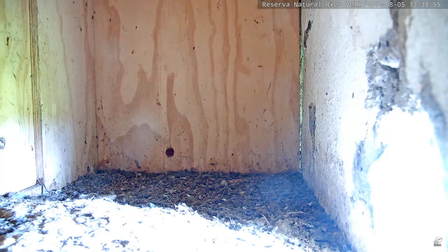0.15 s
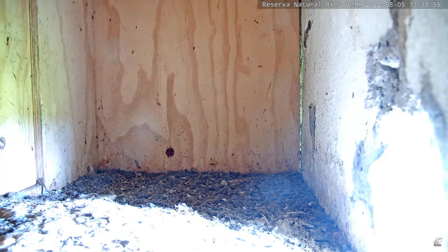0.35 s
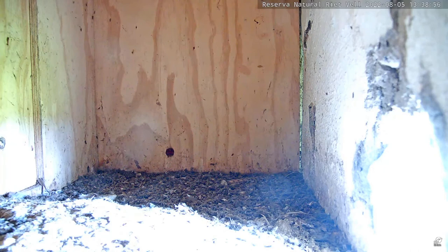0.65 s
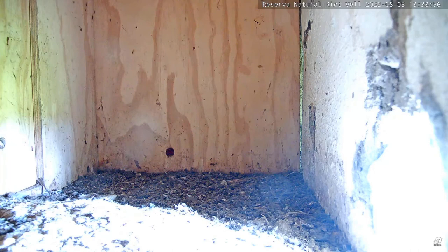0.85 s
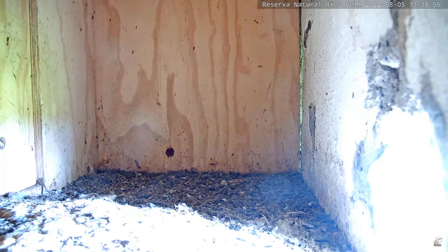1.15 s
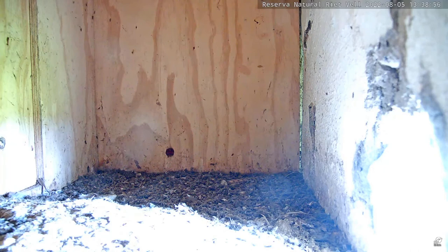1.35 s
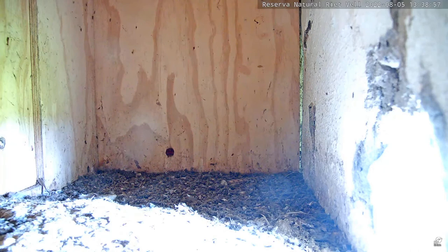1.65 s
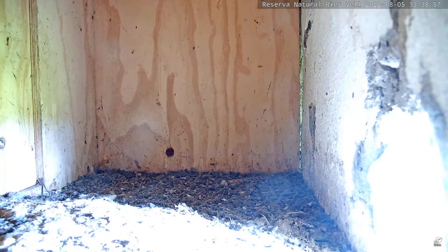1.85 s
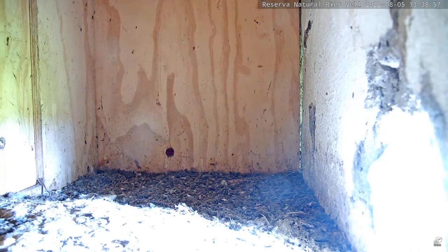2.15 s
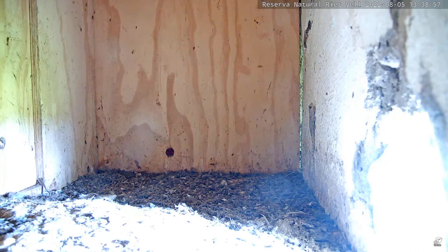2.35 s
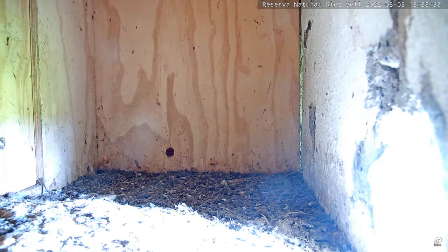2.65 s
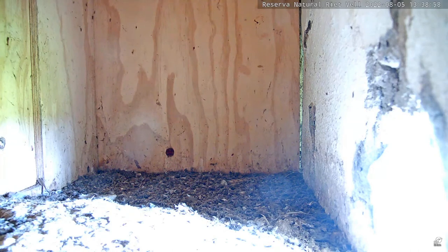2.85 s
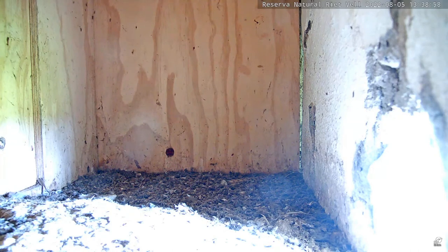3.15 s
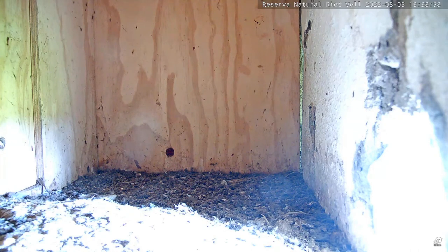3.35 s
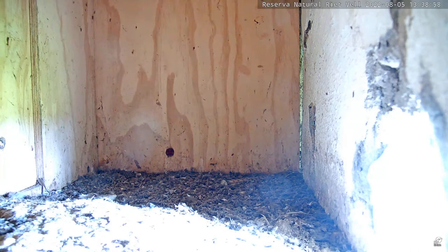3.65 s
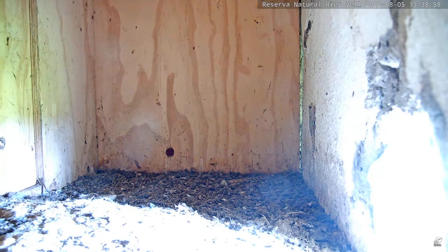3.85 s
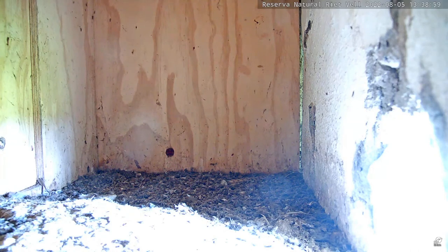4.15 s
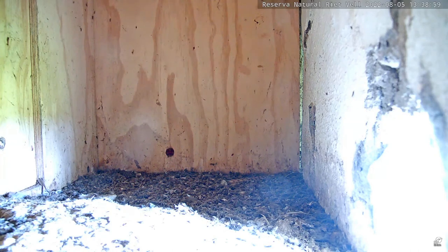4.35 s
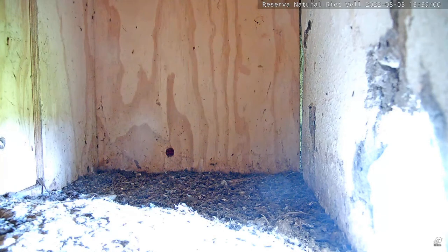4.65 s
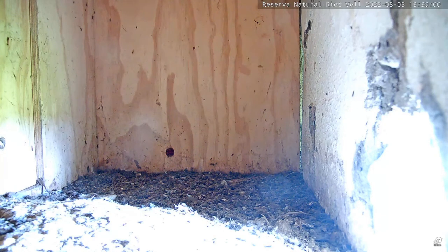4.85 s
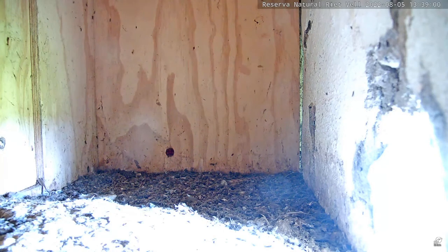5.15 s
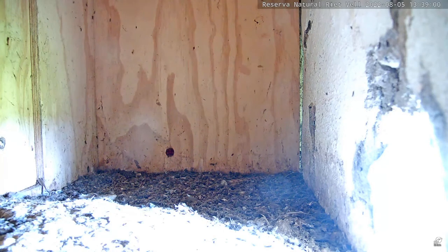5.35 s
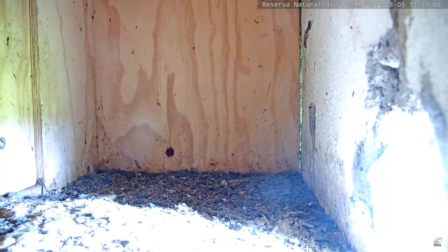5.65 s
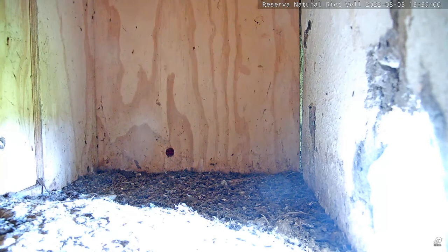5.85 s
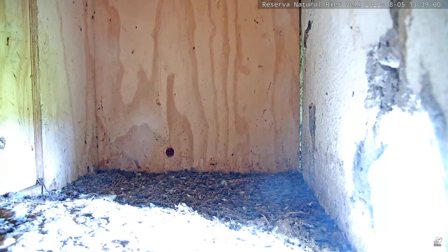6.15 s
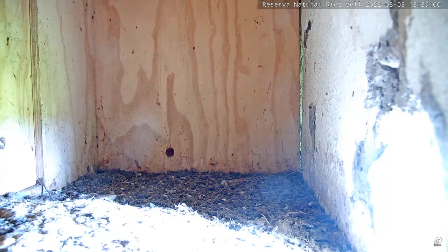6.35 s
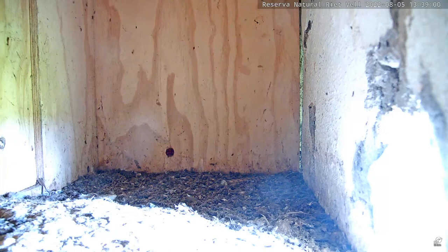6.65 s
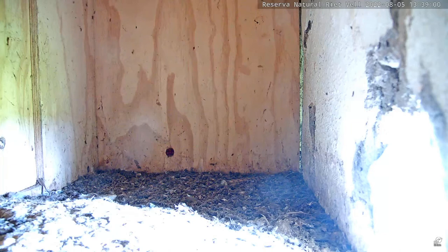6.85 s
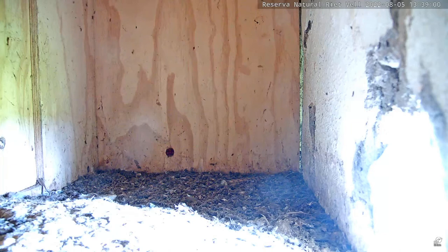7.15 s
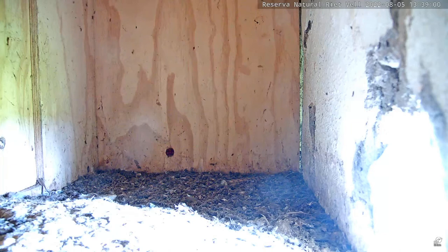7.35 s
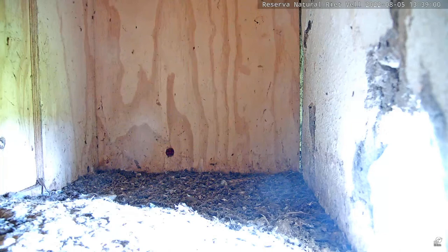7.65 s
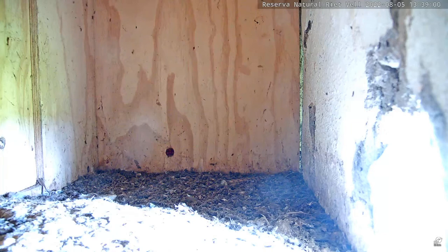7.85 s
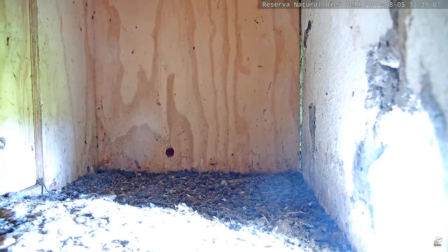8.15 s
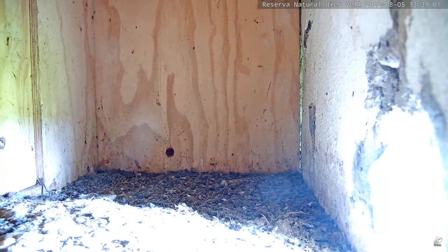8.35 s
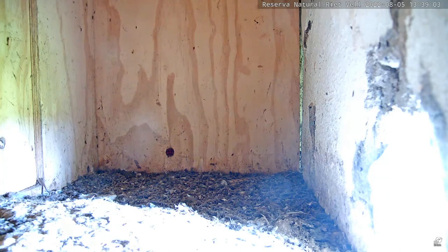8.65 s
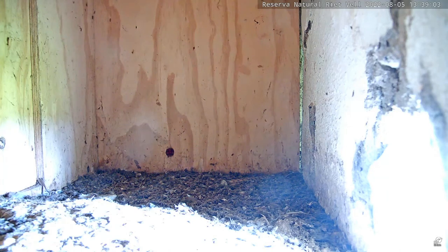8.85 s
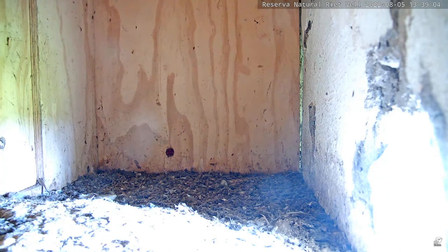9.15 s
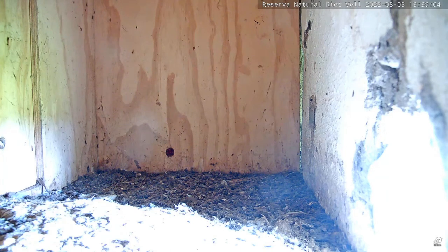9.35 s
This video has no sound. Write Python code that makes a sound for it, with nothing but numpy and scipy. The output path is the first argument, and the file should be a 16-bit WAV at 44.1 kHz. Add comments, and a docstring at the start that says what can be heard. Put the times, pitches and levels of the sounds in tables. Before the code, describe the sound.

Steady low electrical hum and hiss in an empty wooden nest box, cut once by a thump and a brief silence.

```python
"""Inside an empty wooden nest box, on the camera's own microphone. Up front is mains hum from the
power supply, which gulps current at each crest, over steady electronic hiss. A few faint, high rustles
come from outside the box. Near the end the signal cuts out with a thump, stays silent for a third of
a second, then clicks back in and swells to its former level."""
import sys
import numpy as np
from scipy.fft import rfft, irfft, next_fast_len
from scipy.io import wavfile
from scipy.ndimage import map_coordinates

SR = 44100
rng = np.random.default_rng(int(sys.argv[2]) if len(sys.argv) > 2 else 0)


def inscribe(sig):
    """Save sig as 16-bit PCM at rate SR to the path in sys.argv[1].

    A 1-D sig is mono; a 2-D sig holds one channel per row.
    Samples are clipped to [-1, 1] before scaling.
    """
    pcm = np.round(np.clip(np.atleast_2d(sig).T, -1, 1) * 32767)
    wavfile.write(sys.argv[1], SR, pcm.astype(np.int16))


N = 418491


def amp(db):
    """Decibels to gain."""
    return 10 ** (np.asarray(db) / 20)


def unit_rms(x):
    """Scale to rms 1."""
    return x / np.sqrt(np.mean(x ** 2) + 1e-20)


def curve_at(points, hz):
    """Read (frequency_hz, value) points on a log frequency axis."""
    knots_hz, values = np.transpose(points)
    return np.interp(np.log(hz + 1), np.log(knots_hz + 1), values)


def clock():
    """The time of each sample in seconds."""
    return np.arange(N) / SR


def wobble(rate_hz):
    """A smooth random curve with rate_hz knots a second."""
    knots = rng.standard_normal(int(N * rate_hz / SR) + 4)
    return map_coordinates(knots, [clock() * rate_hz])


def filtered(x, response):
    """Multiply the spectrum of x by response(hz)."""
    size = next_fast_len(N + SR // 2)
    hz = np.fft.rfftfreq(size, 1 / SR)
    return irfft(rfft(x, size) * response(hz), size)[..., :N]


def shaped_noise(spectrum):
    """Noise of rms 1, coloured by (frequency_hz, relative_db) points."""
    white = rng.standard_normal(N)
    return unit_rms(filtered(white, lambda hz: amp(curve_at(spectrum, hz))))


def mains_hum(mains_hz=50, crest_s=.0018, lag_corner_hz=300, waver_db=0.3):
    """The supply gulps current at each mains crest: odd harmonics line up into alternating pulses."""
    # Harmonics of the hum: mains_multiple, level_db
    harmonics = [(1, -29.5), (2, -64.5), (3, -32.5), (4, -63), (5, -44.5), (7, -52), (9, -51.5),
                 (11, -62.5), (15, -72), (17, -74.5), (19, -73.5), (21, -77), (23, -72)]
    since_crest = clock() - crest_s
    pulses = np.zeros(N)
    for multiple, level_db in harmonics:
        hz = multiple * mains_hz
        # the upper harmonics lag, so each pulse rises slowly and falls fast
        lag = np.pi / 2 / (1 + (lag_corner_hz / hz) ** 10)
        pulses += np.sqrt(2) * amp(level_db) * np.cos(2 * np.pi * hz * since_crest - lag)
    return pulses * amp(waver_db * wobble(rate_hz=6))


def electronic_noise(supply_db=-45.0, hiss_db=-46, waver_db=0.27):
    """The supply lays a dull bed of noise under the hum; the microphone adds a wide, bright hiss."""
    # Low noise of the supply: frequency_hz, relative_db
    supply_spectrum = [(10, -11), (30, -3), (60, -1.5), (170, 0.5), (240, -3.5), (300, -5.5), (440, -7.5),
                       (540, -12), (680, -21.5), (1000, -34.5), (2500, -78)]
    # Hiss of the microphone: frequency_hz, relative_db
    hiss_spectrum = [(400, -12.5), (900, -7.5), (1180, -0.5), (1800, 0.5), (2300, -3), (3050, -1),
                     (3900, -5), (4950, -5), (5900, -10), (7200, -7), (9400, -6), (11000, -7),
                     (13600, -7.5), (15000, -25)]
    bed = amp(supply_db) * shaped_noise(supply_spectrum)
    hiss = amp(hiss_db + waver_db * wobble(rate_hz=4)) * shaped_noise(hiss_spectrum)
    return bed + hiss


def rustles():
    """Rustles outside the box: soft, narrow swells of noise that barely rise out of the hiss."""
    # One swell a row: middle_s, half_length_s, centre_hz, width_hz, level_db
    swells = [(2.64, .1, 1700, 300, -55.5), (2.824, 0.14, 1320, 350, -55), (6.63, .07, 3900, 600, -59)]
    out = np.zeros(N)
    for middle_s, half_length_s, centre_hz, width_hz, level_db in swells:
        white = rng.standard_normal(N)
        band = filtered(white, lambda hz: np.exp(-2 * ((hz - centre_hz) / width_hz) ** 2))
        envelope = np.exp(-((clock() - middle_s) / half_length_s) ** 2)
        out += amp(level_db) * unit_rms(band) * envelope
    return out


def thump(start_s, level_db, ring_hz=75, t60_s=.018, rise_s=.0006):
    """A rounded voltage step that swings through zero and quickly settles."""
    age = np.maximum(clock() - start_s, 0)
    rise = 1 - np.exp(-age / rise_s)
    decay = amp(level_db - 60 * age / t60_s)
    return rise * decay * np.cos(2 * np.pi * ring_hz * age)


def dropout(x, cut_s=8.1143, resume_s=8.4743, missing_gain=.57, recovery_s=.175):
    """The signal breaks off, then returns at reduced level and recovers; both edges thump."""
    t = clock()
    since_resume = np.maximum(t - resume_s, 0)
    recovery = 1 - missing_gain * np.exp(-since_resume / recovery_s)
    gain = (t < cut_s) + (t > resume_s) * recovery
    return x * gain + thump(cut_s, level_db=-16) - thump(resume_s, level_db=-30)


def scene():
    """Hum, hiss and rustles on one microphone, with slightly different colour and phase per channel."""
    # Colour between the channels: frequency_hz, left_over_right_db
    balance = [(270, 0), (470, -3.3), (780, 0), (1220, -4.8), (1780, 0), (2800, 3), (4000, 3), (5000, 1.2),
               (6000, 0)]
    # Phase between the channels: frequency_hz, left_lead_rad
    phase_lead = [(170, 0), (350, .33), (620, -.1), (830, 0), (1000, .28), (1500, -.35), (2050, -.19),
                  (2400, 0)]
    mono = mains_hum() + electronic_noise() + rustles()
    split = np.array([[.5], [-.5]])  # half to the left, half the opposite way to the right

    def channel_response(hz):
        return amp(split * curve_at(balance, hz)) * np.exp(1j * split * curve_at(phase_lead, hz))

    return filtered(mono, channel_response)


def record(dry):
    """The camera drops out once and keeps nothing above its band limit."""
    band_limit_hz = 15200
    return filtered(dropout(dry), lambda hz: 1 / np.sqrt(1 + (hz / band_limit_hz) ** 400))


dry = scene()
out = record(dry)
inscribe(out)
```